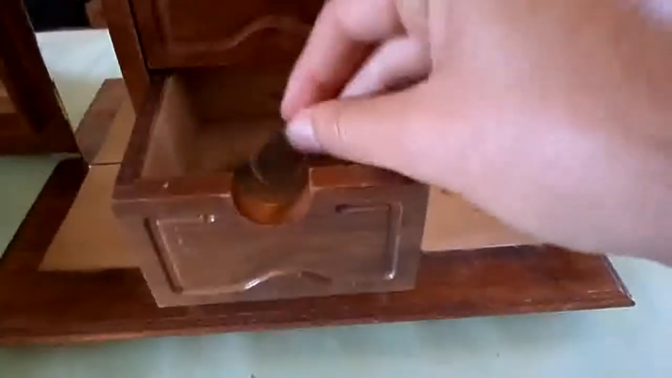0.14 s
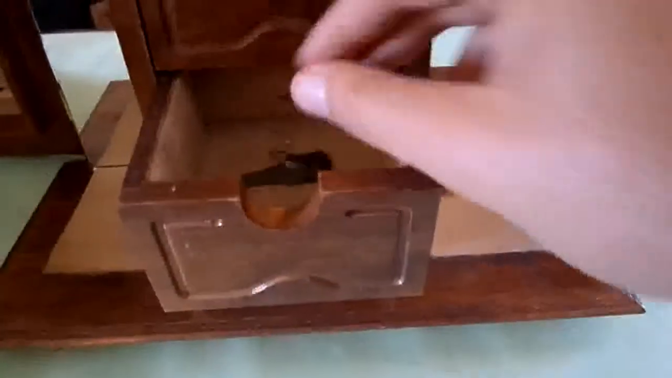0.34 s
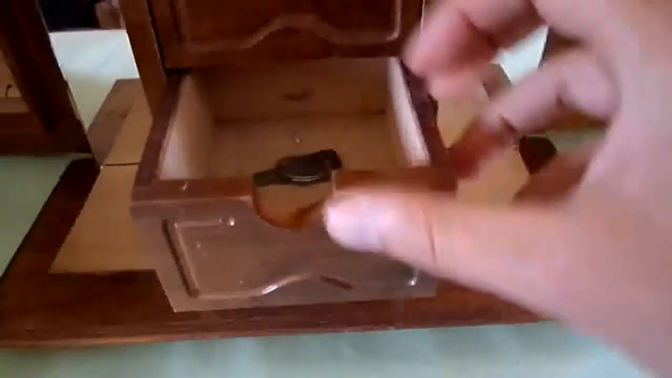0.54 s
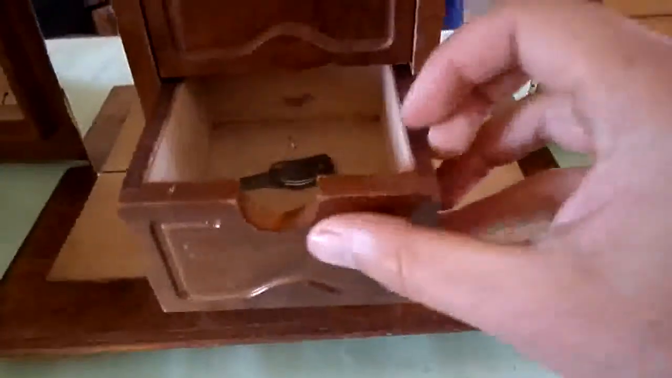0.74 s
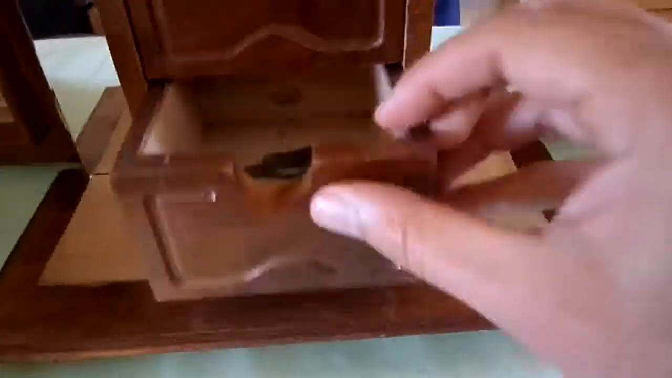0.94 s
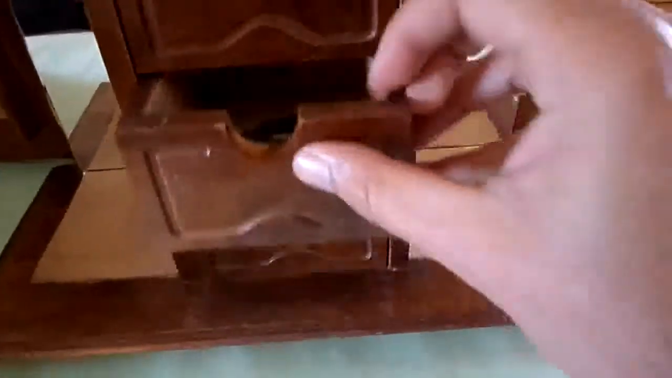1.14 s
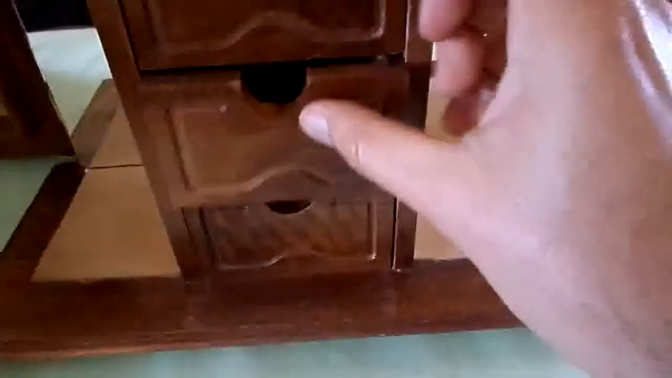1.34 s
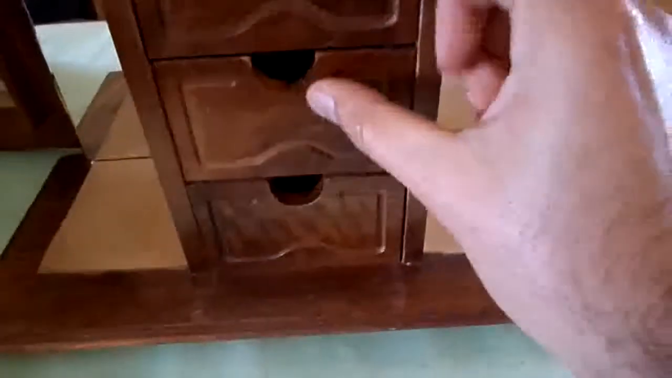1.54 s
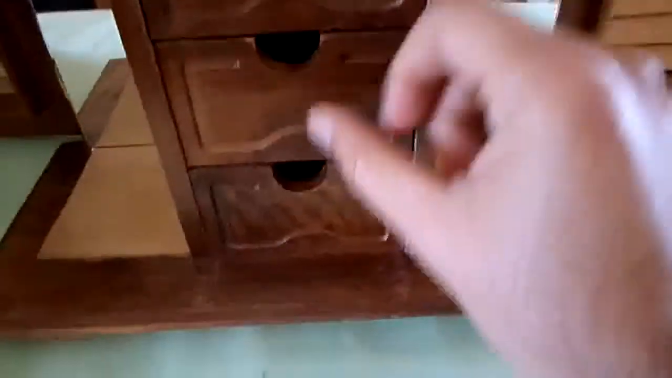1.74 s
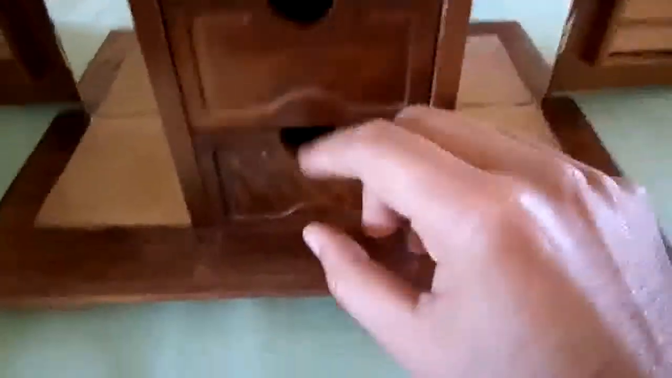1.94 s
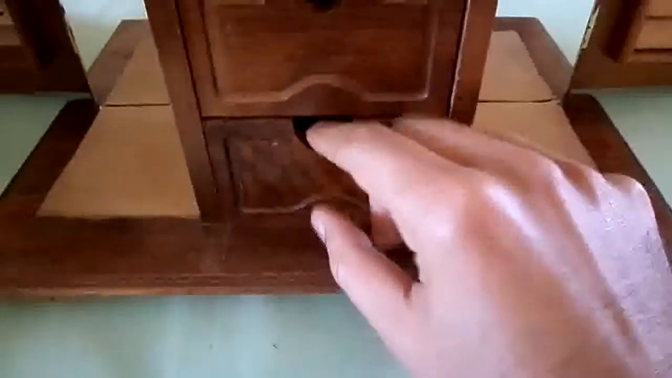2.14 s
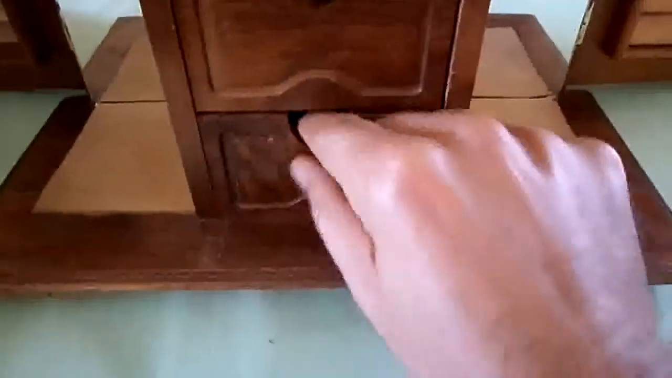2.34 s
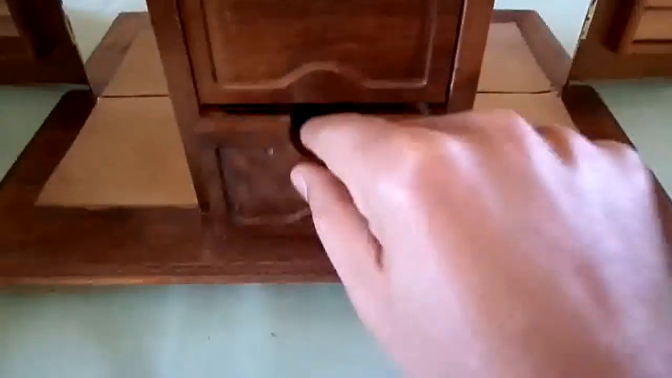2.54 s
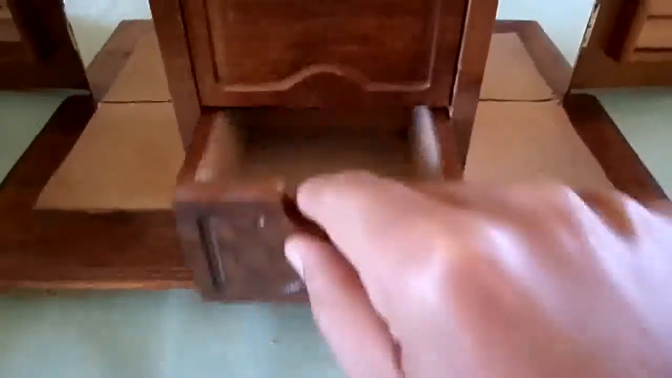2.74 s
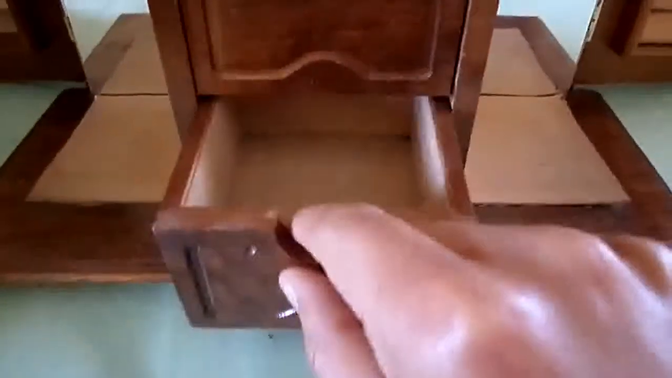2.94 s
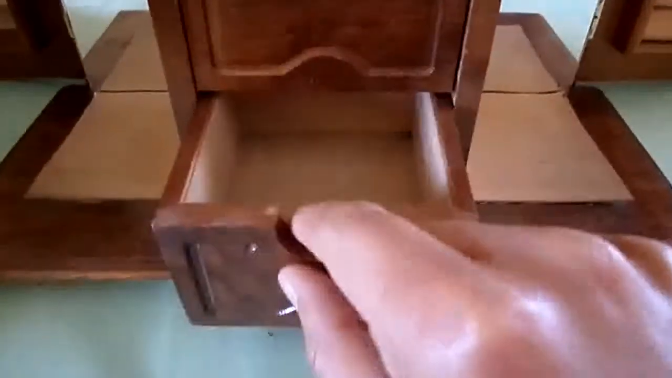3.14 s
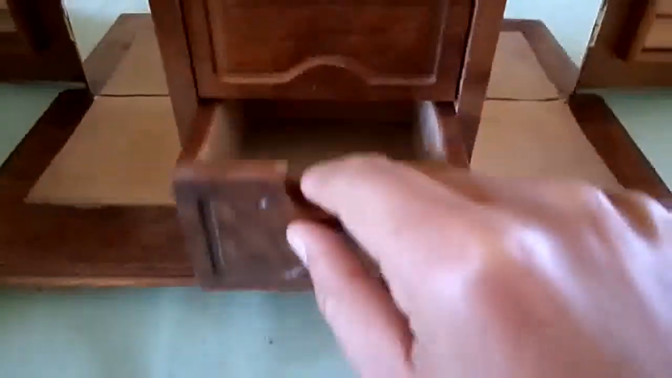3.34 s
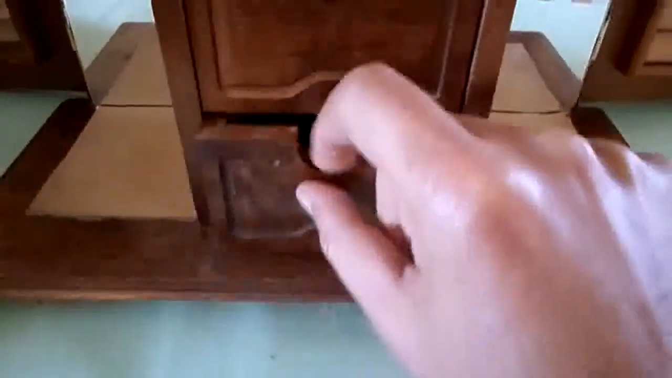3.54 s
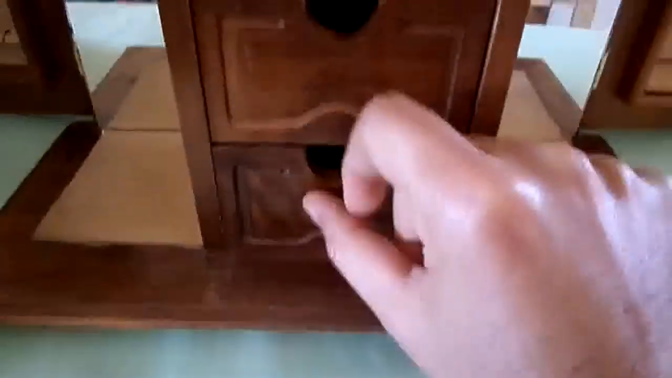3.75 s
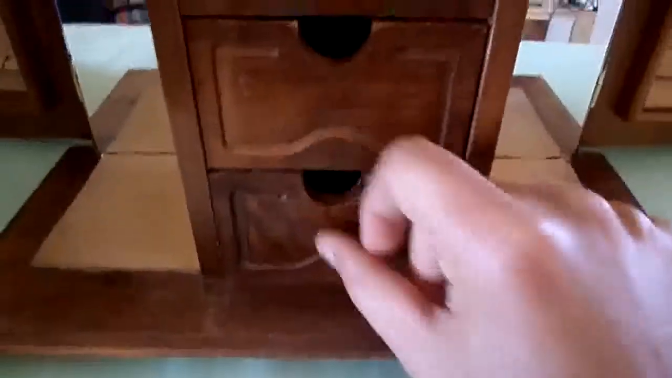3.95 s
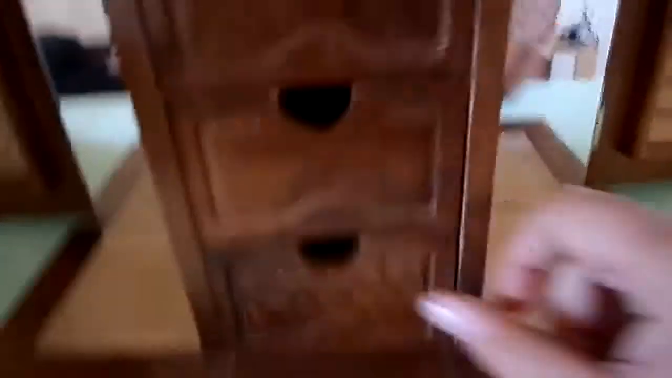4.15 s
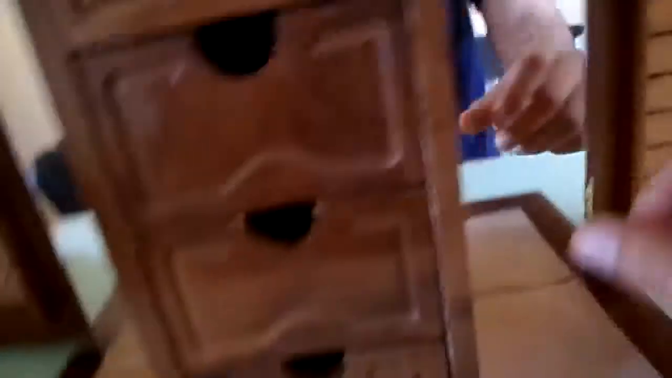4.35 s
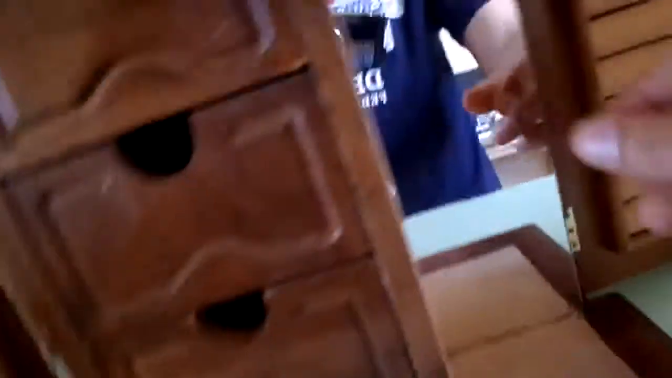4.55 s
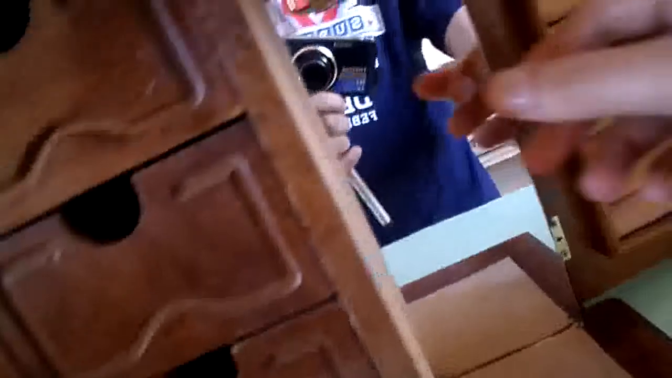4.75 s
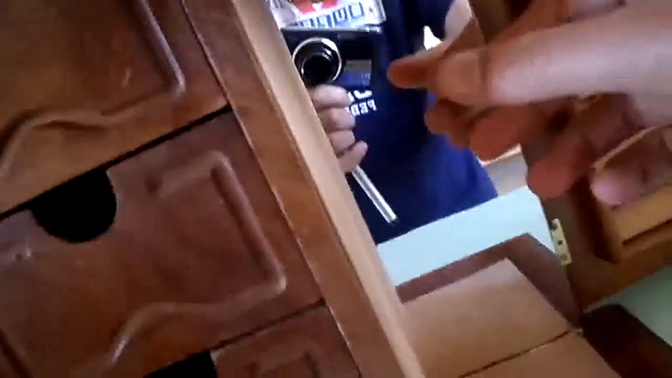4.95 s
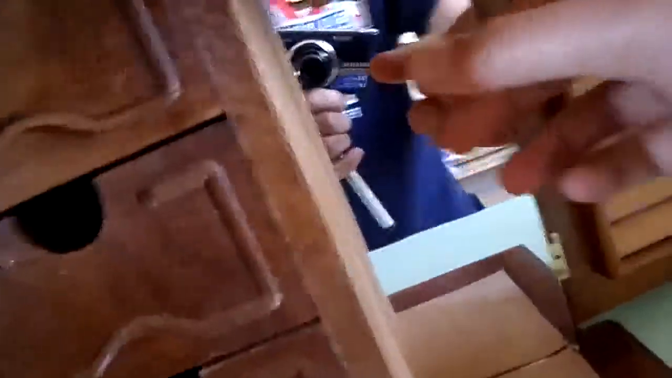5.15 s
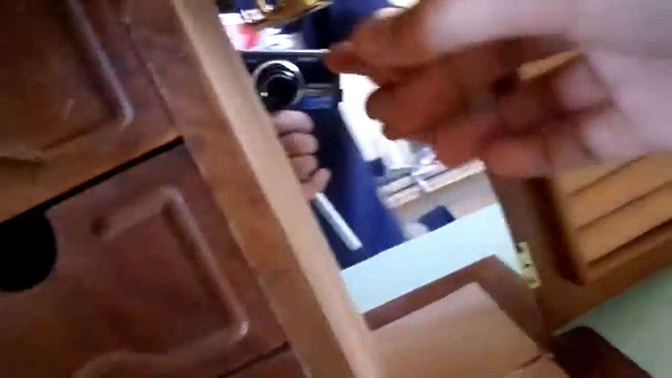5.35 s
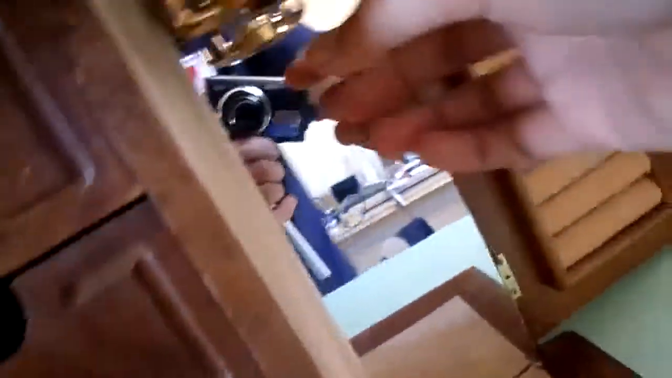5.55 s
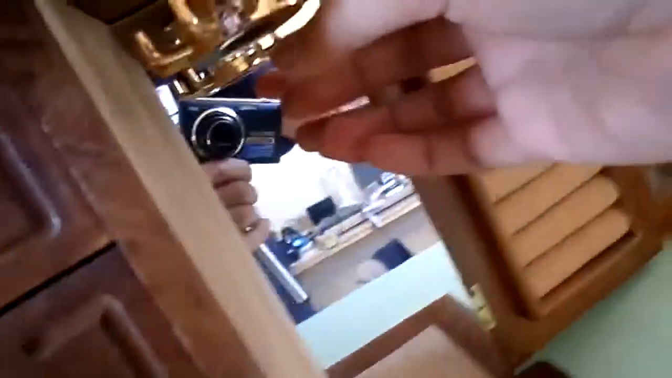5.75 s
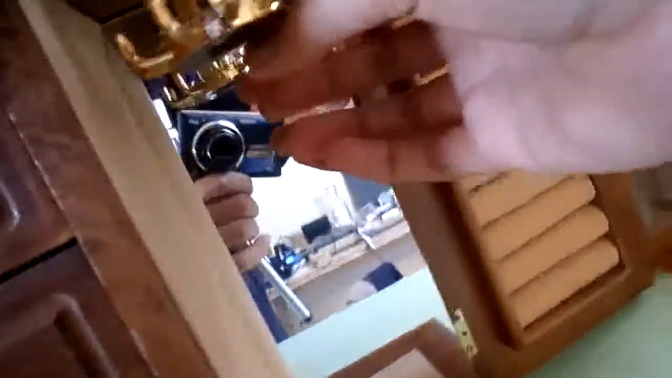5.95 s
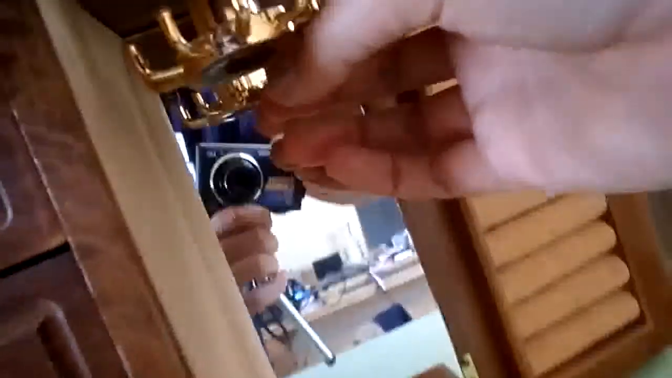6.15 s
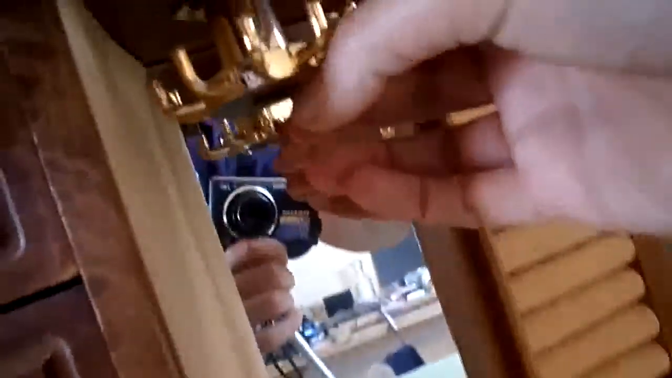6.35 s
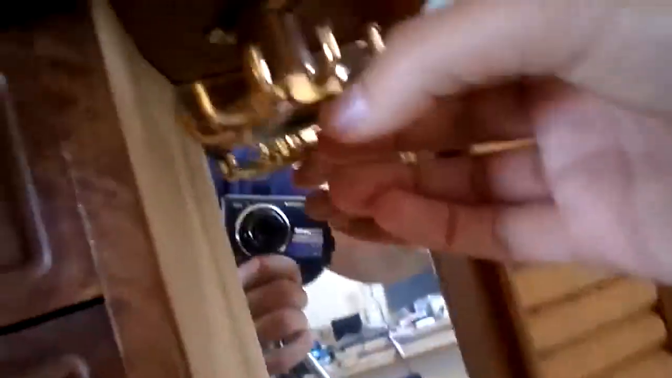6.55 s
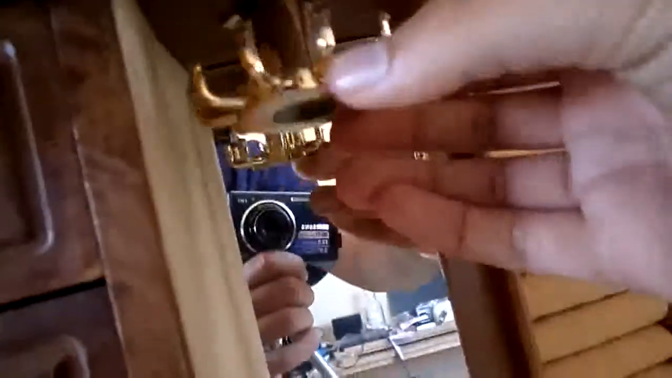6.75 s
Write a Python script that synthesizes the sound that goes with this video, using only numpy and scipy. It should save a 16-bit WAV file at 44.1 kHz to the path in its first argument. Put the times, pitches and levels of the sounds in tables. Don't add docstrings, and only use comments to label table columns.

```python
import sys
import numpy as np
from scipy import signal
from scipy.fft import rfft, irfft, next_fast_len
from scipy.io import wavfile
from scipy.ndimage import uniform_filter1d, minimum_filter1d, map_coordinates

SR = 44100
rng = np.random.default_rng(int(sys.argv[2]) if len(sys.argv) > 2 else 0)


def field_ratio(decibels):
    return 10 ** (np.asarray(decibels, dtype=float) / 20)


def pcm_store(signal):
    levels = np.round(np.clip(np.atleast_2d(signal), -1, 1) * 32767)
    wavfile.write(sys.argv[1], SR, levels.astype(np.int16).T)


N = 304290

# f/Hz, spectrum level/dB
HUM = [(12, -77.5), (20, -20), (71, -17), (171, -14), (500, -20.5), (900, -25), (8300, -36.5),
       (18300, -120)]
# f/Hz, width/Hz, level over floor/dB
DRONES = [(229, 54, 5.5), (357, 170, -6.5), (600, 110, 3), (7600, 670, -6)]
# f/Hz, t60/s
ROOM = [(200, 0.45), (1000, 0.17), (4000, 0.18), (8000, 0.047)]

# t/s, weight on runners/dB, speed/dB
STROKES = [
    [(.86, -73, -91), (.896, -49.5, -56.5), (.964, -29.5, -56.5), (1.07, -44.5, -55.5), (1.104, -31.5, -47),
     (1.18, -39.5, -50), (1.44, -46, -54), (1.57, -43.5, -65.5), (1.66, -56, -70)],
    [(2.42, -62, -69.5), (2.47, -36, -47), (2.53, -28.5, -42), (2.61, -35, -46.5), (2.644, -34.5, -42.5),
     (2.736, -35, -46.5), (2.86, -46.5, -54), (2.968, -51, -67.5), (3.02, -56, -76)],
    [(3.15, -65, -70.5), (3.22, -51, -55), (3.31, -42.5, -51.5), (3.4, -32.5, -44.5), (3.47, -31, -40.5),
     (3.612, -38.5, -48), (3.71, -37.5, -46.5), (3.77, -46, -62), (3.95, -54, -80)],
]
# t/s, length/s, weight/dB, coarse grit/dB, fine grit/dB
TOUCHES = [(.004, 0.039, -70.5, -60, -49), (3.742, 0.027, -32, -35, -57), (.715, 0.16, -37.5, -51.5, -58.5),
           (.96, 0.081, -54, -43, -66), (1.42, 0.66, -53, -52, -71), (1.54, 0.076, -31, -35, -57),
           (1.704, 0.23, -45, -54, -65), (1.81, 0.13, -57, -55.5, -67), (1.904, 0.13, -54.5, -56, -67),
           (2.068, 0.11, -45.5, -52.5, -56.5), (2.098, 0.086, -51, -60, -52.5), (2.31, 0.12, -69, -59, -56),
           (2.35, 0.14, -58, -58, -58), (2.73, 0.14, -51, -46, -70), (3.429, 0.067, -51, -19, -38.5),
           (3.724, 0.078, -21.5, -28, -49.5), (4.17, 0.41, -56.5, -62, -71),
           (4.236, 0.035, -59, -51.5, -56.5), (4.88, 0.47, -52.5, -56.5, -63.5),
           (5.248, 0.26, -59, -58.5, -67)]
# t/s, length/s, level/dB
JUDDERS = [
    (1.028, 0.59, -52),
    (1.104, 0.34, -47),
    (2.63, 0.83, -47.5),
    (3.53, 0.24, -42.5),
]
# from t/s, to t/s, f/Hz, level over grit/dB
SINGING_EDGES = [(0.65, 1, 5000, 9.5), (1.1, 1.1, 4500, 3.5), (0.75, 1.02, 2000, 8), (0.98, 1.4, 2100, 4.5),
                 (1.4, 0.83, 3800, 5.5), (1.42, 1.47, 2600, 3.5), (1.093, 1.384, 4610, 4.5),
                 (1.302, 1.46, 1050, 6.5), (2.445, 2.611, 1900, 1), (2.485, 2.579, 6550, 6.5),
                 (2.447, 2.857, 2920, 2), (2.591, 2.8, 4100, 0.5), (2.78, 2.97, 4170, 4.5),
                 (3.5, 3.3, 4100, 5), (3.24, 3.38, 3700, 1), (3.43, 5.2, 6610, -4.5), (3.53, 3.62, 4090, 2),
                 (3.456, 3.53, 3300, 1.5), (3.9, 3.72, 6630, 8.5), (3.61, 5.7, 1885, -10)]
# f/Hz, spectrum level/dB
SCRAPE = [(760, -19.5), (1300, -8), (3400, -13.5), (4130, -7), (4940, -7.5), (6630, -2.5), (8300, -9),
          (18300, -120)]
# f/Hz, width/Hz, level/dB
CASE = [(120, 30, -7.5), (178.7, 55, -6), (301.4, 127, -3), (467.4, 220, -4)]
# f/Hz, width/Hz, level/dB
UPPER = [(661, 170, 0), (844, 340, -3), (1200, 200, -10.5), (1490, 60, -20)]
# f/Hz, width/Hz, level/dB
LOWER = [(659, 220, -5.5), (821, 130, 0), (1130, 170, -5.5), (1988, 120, -9.5)]

# t/s, peak level/dB, tick level/dB, air over board level/dB, upper-mode level/dB
BOUNCES = [
    (.175, -35, -15, 5, 10),
    (0.188, -1, -18, 3.5, 3),
    (0.238, -10, -26, 5, 4.5),
    (0.2459, -1.5, -38, -6.5, -0.5),
    (0.2954, -12, -32, -12, -6),
    (0.3087, -10, -26, 1, -5),
    (0.3353, -1.5, -20, 10, 10),
    (0.359, -34, -7, 4, 3),
    (.37, -46, -8, 3.5, 3),
    (0.421, -55, 8, 3, 3),
]
# f/Hz, level/dB, t60/s
BOTTOM = [(785, 4.5, 0.045), (942, 2.5, 0.016), (490, -33.5, 0.085), (301.5, -20.5, 0.07)]
# f/Hz, level/dB, t60/s
AIR = [(1033, 5.5, 0.028), (1180, -23.5, 0.02)]
# f/Hz, level/dB, t60/s
FACE = [(1523, -23.5, 0.045), (1880, -13.5, 0.017), (2740, -10.5, 0.009), (3200, -15, 0.0091),
        (4830, -10.5, 0.006)]
# f/Hz, width/Hz, level/dB
HOLLOW = [(1082, 127, 3), (766, 136, -1.5)]
# t/s, length/s, singing level/dB, chatter level/dB
WOBBLES = [(.25, 0.045, -44, -40), (.278, 0.053, -47, -60), (.302, 0.073, -37.5, -48.5),
           (.32, 0.046, -44, -40.5), (.338, 0.05, -58, -26.5), (.362, 0.045, -57, -48),
           (.39, 0.074, -66, -54), (.42, 0.087, -55, -56.5)]
# f/Hz, width/Hz, level/dB
RIM = [(7600, 1000, 6), (5460, 2000, 6), (4210, 110, 10), (3500, 460, 2), (2095, 1100, 9)]
# f/Hz, width/Hz
VALLEYS = [(3850, 280), (6050, 450)]

# t/s, length/s, f/Hz, level/dB
CATCHES = [(.181, 0.023, 1340, -32), (.183, 0.018, 890, -32.5), (1.04, 0.071, 497, -44),
           (1.077, 0.027, 870, -36), (1.228, .05, 700, -42), (1.3, 0.028, 715, -42),
           (1.45, 0.045, 1200, -35.5), (2.66, 0.056, 504, -35), (2.68, 0.044, 1180, -36),
           (2.735, .04, 1140, -29.5), (2.778, 0.088, 1174, -40), (3.36, 0.074, 1146, -38),
           (3.661, .06, 427, -35), (3.81, .06, 497, -37.5), (3.857, .05, 328, -48),
           (1.0, 0.072, 822, -32.5), (1.105, 0.091, 806, -33), (1.11, 0.048, 293, -35),
           (1.2, 0.06, 276, -38.5), (1.27, 0.059, 194, -31.5), (1.27, 0.058, 670, -38),
           (1.32, .04, 725, -34), (1.36, 0.04, 726, -34.5), (1.378, 0.036, 420, -32),
           (1.475, 0.13, 452, -30), (1.59, 0.043, 307, -39), (2.5, 0.17, 476, -30.5),
           (2.59, 0.063, 424, -37), (2.625, 0.1, 812, -34.5), (2.76, 0.065, 553, -33), (2.8, .08, 450, -33),
           (2.89, 0.087, 300, -40.5), (3.27, 0.066, 836, -45.5), (3.435, 0.056, 314, -16),
           (3.47, 0.067, 317, -27), (3.5, 0.075, 782, -24), (3.528, 0.093, 874, -23.5),
           (3.54, 0.039, 244, -27.5), (3.575, .06, 264, -30.5), (3.575, .06, 850, -33),
           (3.62, 0.033, 870, -30.5), (3.65, 0.042, 810, -33), (3.688, 0.075, 448, -30.5),
           (3.76, 0.054, 437, -29), (3.9, 0.29, 416, -50.5)]
# t/s, length/s, f/Hz, level/dB
WHINES = [(.40, .1, 1110, -38), (.465, 0.083, 1130, -44.5), (.515, .09, 1073, -48), (.52, .12, 817, -54),
          (.59, .2, 1100, -58), (.44, .08, 732, -45.5), (.995, .07, 2220, -44), (1.05, .06, 2220, -51),
          (2.08, .1, 3080, -56), (2.08, .1, 1970, -58), (2.085, .1, 5000, -57), (2.335, .08, 1180, -54),
          (2.345, .09, 2460, -58), (2.485, .05, 1900, -41), (2.66, .08, 2900, -44), (2.83, .1, 2850, -52.5),
          (2.9, .2, 4150, -59), (5.99, .04, 1056, -38.5), (5.985, .06, 3750, -49), (6.44, .07, 3690, -55),
          (6.715, .04, 1240, -50)]

# t/s, peak level/dB, ring centre f/Hz, tick level/dB, t60/s
UPPER_KNOCKS = [(.722, -32.5, 600, -23, 0.047), (.916, -28, 786, -11, 0.26), (.938, -12, 808, -41, 0.046),
                (.953, -12.5, 1050, -20, 0.019), (.961, -16.5, 413, -21, 0.021),
                (1.076, -25, 820, -22, 0.037), (1.094, -29, 755, -24.5, 0.069),
                (1.128, -21.5, 300, -17, 0.14), (1.148, -15.5, 862, -33, 0.07),
                (1.167, -19, 890, -25, 0.038), (1.247, -26, 684, -11, 0.086),
                (1.347, -29, 1180, -19, 0.034), (1.401, -13, 463, -39, 0.083),
                (1.436, -12.5, 430, -22, 0.055), (1.531, -34.5, 880, 2, 0.026),
                (1.539, -15, 322.6, -31, 0.11), (1.702, -35, 171, -4, 0.07)]
# t/s, peak level/dB, ring centre f/Hz, tick level/dB, t60/s
LOWER_KNOCKS = [(2.164, -29.5, 336, -15, 0.051), (2.454, -35, 695, -8.5, 0.022),
                (2.458, -19, 460, -20, 0.023), (2.477, -24, 503, -23, 0.12), (2.5418, -11, 496, -16, 0.024),
                (2.56, -12.5, 475, -23, 0.049), (2.705, -17, 454, -23, 0.046),
                (2.709, -13.5, 855, -26.5, 0.051), (2.726, -20.5, 408, -24, 0.032),
                (2.723, -15, 1200, -26, 0.047), (2.953, -33, 398, -14, 0.084),
                (2.956, -35, 886, -18, 0.034), (3.22, -28.5, 472, -21.5, 0.039),
                (3.335, -17, 427, -31.5, 0.1), (3.336, -21.5, 838, -25.5, .13),
                (3.3972, -14, 429, -18, 0.19), (3.4246, -8, 672, -20.5, 0.012),
                (3.4263, 2.5, 808, -20, 0.032), (3.44, -8.5, 540, -26.5, 0.028),
                (3.706, -16.5, 490, -29, 0.026), (3.718, -14.5, 308, -2.5, 0.024),
                (3.729, -16, 428, -25, 0.037), (3.7391, -7.5, 499, -27, 0.023),
                (3.7395, -19.5, 1020, -17, 0.011), (3.746, -17, 408, -28, 0.021)]
# t/s, peak level/dB, f/Hz, t60/s
SNAPS = [(.7225, -35, 900, 0.019), (.915, -33, 850, .03), (1.2485, -31, 750, .03),
         (1.5325, -30, 1880, .015), (2.5425, -12, 720, 0.01), (2.726, -29.5, 1810, 0.032),
         (3.397, -21.5, 600, .03), (3.4255, -11.5, 812, .03), (3.7195, -14, 600, .01),
         (1.5335, -35.5, 2980, .012), (1.535, -36, 4630, 0.009), (3.428, -25, 2400, .012),
         (3.7195, -26, 3600, .01), (3.7405, -24.5, 2080, 0.014), (2.562, -19, 1000, 0.022)]
# t/s, peak level/dB, f/Hz
THUMPS = [
    (0.949, -45, 148),
    (1.542, -33.5, 120),
    (1.849, -54, 103.5),
    (2.549, -36.5, 144),
    (3.427, -37.5, 97),
    (3.742, -43.5, 100.6),
]

# t/s, peak level/dB, ring f/Hz, t60/s, click over ring level/dB
TICKS = [(1.694, -40, 3960, 0.012, 0), (1.802, -41, 4460, 0.01, -5), (1.899, -47, 4050, 0.01, -7),
         (2.0661, -22, 3820, 0.018, -3), (4.235, -53, 1620, 0.0089, -5), (5.915, -37, 2370, .015, 2),
         (5.924, -31, 2190, 0.024, 2), (5.931, -29, 2400, 0.033, -5), (5.9389, -22, 3740, 0.023, -1),
         (5.9415, -25, 2430, 0.02, -7), (5.9465, -31, 2700, .015, -11), (5.9876, -36, 5200, 0.011, 0),
         (5.996, -36, 5830, .012, 2), (5.9955, -26.5, 2620, 0.019, -8), (6.4002, -30, 1400, 0.014, 5),
         (6.4088, -25, 3830, 0.012, 8), (6.4205, -29, 1150, .025, -1), (6.425, -26.5, 3730, 0.028, -11),
         (6.473, -42, 3720, .012, -9), (6.474, -37, 1910, 0.047, -12), (6.689, -30, 6550, 0.042, -9),
         (6.6953, -15.5, 3710, 0.022, -9), (6.6953, -23.5, 3080, 0.011, -9),
         (6.6953, -26, 5080, 0.023, -12), (6.699, -31, 4500, 0.011, 3), (6.716, -44, 3300, .03, 2),
         (6.74, -45, 3200, .03, 3), (6.8606, -47, 1880, 0.04, 4)]
# f/Hz, level/dB
HOOKS = [(2350, -10), (3000, 14.5), (3730, 1), (5050, 12.5), (6500, 5)]
# t/s, length/s, rasp level/dB, side panel level/dB
NUDGES = [(5.94, 0.14, -38.5, -43.5), (5.975, 0.11, -48, -72), (5.995, 0.072, -39, -37),
          (6.015, 0.039, -73, -32.5), (6.06, .1, -57, -51), (6.2, 0.098, -75, -48),
          (6.305, 0.14, -59, -45.5), (6.412, 0.093, -36.5, -41.5), (6.44, 0.044, -58, -39.5),
          (6.476, 0.043, -48.5, -58), (6.52, 0.11, -59, -49), (6.635, 0.13, -55.5, -40.5),
          (6.693, 0.025, -38.5, -42), (6.722, 0.093, -50.5, -33.5), (6.79, 0.12, -55, -46),
          (6.845, 0.14, -57, -43.5), (6.89, .1, -61, -46.5)]
# f/Hz, spectrum level/dB
RASP = [(470, -2.5), (800, -13), (1080, 4), (1770, -9), (2280, -2.5), (3600, -8.5), (6630, -11),
        (8300, -28)]
# f/Hz, level/dB
SIDE_PANEL = [(186, 2), (297, -14), (410, -18.5), (570, -16)]
# t/s, f/Hz, level/dB
SQUEAK = [
    (2.05, 3700, -65),
    (2.064, 3770, -41.5),
    (2.108, 3680, -44),
    (2.116, 3730, -70),
    (2.15, 3680, -71),
]

SWAP_S = 2
CONTACT_S = 0.001314
RISE_SHARE = 0.38
SWELL_EDGE_DB = 32
TOP_HZ = 8450


def unit(x):
    return x / np.sqrt(np.mean(x ** 2) + 1e-20)


def along(points, hz):
    f, v = np.transpose(points)
    return np.interp(np.log(hz + 1), np.log(f + 1), v)


def gains(tables, column):
    t = np.arange(N) / SR
    total = 0
    for rows in tables:
        points = np.array(rows)
        total = total + field_ratio(np.interp(t, points[:, 0], points[:, column], -200, -200))
    return total


def swells(rows, column):
    out = np.zeros(N + 2 * SR)
    t = np.arange(-SR // 5, SR // 4) / SR
    for row in rows:
        rise_s = RISE_SHARE * row[1]
        fall_s = row[1] - rise_s
        drop_db = SWELL_EDGE_DB * np.maximum(-t / rise_s, t / fall_s) ** 1.1
        add(out, row[0], field_ratio(row[column] - drop_db))
    return out[SR // 5:][:N]


def wobble(rate_hz):
    knots = rng.standard_normal(int(N * rate_hz / SR) + 4)
    return map_coordinates(knots, [np.arange(N) * rate_hz / SR])


def filtered(x, response):
    m = next_fast_len(N + SR // 2)
    return irfft(rfft(x, m) * response(np.fft.rfftfreq(m, 1 / SR)), m)[:N]


def modes(table):
    def response(f):
        total = 0
        for k, (centre, width, db) in enumerate(table):
            damping = 1j * f * width
            total = total + (-1) ** k * field_ratio(db) * damping / (centre * centre - f * f + damping)
        return total
    return response


def grit(rough_db, clump_db):
    level_db = rough_db * wobble(300) + clump_db * wobble(45)
    return unit(rng.standard_normal(N) * field_ratio(level_db))


def patchy(x, depth_db):
    z = signal.stft(x, nperseg=512)[2]
    field = uniform_filter1d(rng.standard_normal(z.shape), 4, axis=0)
    field = uniform_filter1d(field, 9, axis=1)
    return signal.istft(z * field_ratio(depth_db * unit(field)), nperseg=512)[1][:N]


def add(track, s, sound):
    spot = track[round(s * SR):][:len(sound)]
    spot += sound[:len(spot)]


def ring(table, t, attack_s, lag_s=0):
    x = sum(field_ratio(db - 60 * t / abs(t60)) * np.sin(2 * np.pi * hz * (t - lag_s)) for hz, db, t60 in table)
    x = x * (1 - np.exp(-t / attack_s)) ** 2
    return x / np.abs(x).max()


def crack(t, t60_s, top_hz, rise_s):
    burst = rng.standard_normal(len(t)) * field_ratio(-60 * t / t60_s) * (1 - np.exp(-t / rise_s)) * 2
    return signal.lfilter(*signal.butter(1, [1300, top_hz], "band", fs=SR), burst)


def hum(near):
    depth_db, knee, release_s = 7, 0.1, 0.15
    noise = unit(filtered(rng.standard_normal(N),
                          lambda f: field_ratio(along(HUM, f)) * (1 + np.abs(modes(DRONES)(f)))))
    step = 1 / (release_s * SR)
    loud = signal.lfilter([step], [1, step - 1], near ** 2) ** .5
    return field_ratio(-51 + 0.64 * wobble(2.1) - depth_db * np.tanh(loud / knee)) * noise


def slides():
    case = unit(filtered(grit(2, 1.3), lambda f: np.abs(modes(CASE[1:])(f)) ** 1.4))
    upper = unit(filtered(grit(2, 1.2), lambda f: np.abs(modes(UPPER)(f)) ** 1.5))
    lower = unit(filtered(grit(2, 1.2), lambda f: np.abs(modes(LOWER)(f)) ** 1.5))
    panel = np.where(np.arange(N) < SWAP_S * SR, upper, lower)

    dust = patchy(grit(1.8, .6), depth_db=1.6)
    rubbed = dust.copy()
    edge_width_hz = 340
    for start_s, end_s, hz, db in SINGING_EDGES:
        rub = dust[round(start_s * SR):round(end_s * SR)]
        edge = signal.lfilter(*signal.iirpeak(hz, hz / edge_width_hz, SR), rub)
        add(rubbed, start_s, field_ratio(db) * edge * signal.windows.tukey(len(rub), .5))

    def fine(f):
        return 1 / (1 + (3850 / (f + 1)) ** 8)

    scrape = unit(filtered(rubbed, lambda f: field_ratio(along(SCRAPE, f)) * (1 - fine(f))))
    hiss = unit(filtered(rubbed, lambda f: field_ratio(along(SCRAPE, f)) * fine(f)))

    weight, speed = gains(STROKES, column=1), gains(STROKES, column=2)
    touch, coarse, smooth = (swells(TOUCHES, column=k) for k in range(2, 5))
    speed_share, panel_db, coarse_db = 0.25, -0.5, 2.5
    drive = weight ** (1 - speed_share) * speed ** speed_share
    shake = field_ratio(panel_db) * (drive + 0.38 * touch) + swells(JUDDERS, column=2)
    wood = (weight + touch) * case + shake * panel
    return wood + (field_ratio(coarse_db) * speed + coarse) * scrape + (speed + smooth) * hiss


def coin():
    out, linger = np.zeros(N), np.zeros(N)
    t = np.arange(SR // 2) / SR
    t_hit = t[:SR // 8]
    for s, db, tick_db, air_db, upper_db in BOUNCES:
        air = [(hz, level + air_db, t60) for hz, level, t60 in AIR]
        face = [(hz, level + upper_db, t60) for hz, level, t60 in FACE]
        struck = ring(BOTTOM + air + face, t_hit, 0.00063, CONTACT_S)
        tick = field_ratio(tick_db - 5.0) * crack(t_hit, 0.023, top_hz=5480, rise_s=0.0019)
        add(out, s, field_ratio(db) * (struck + tick))
        add(linger, s, field_ratio(db - 39 - 60 * t / 0.53) * (1 - np.exp(-t / .012)))
    hollow = unit(filtered(grit(0.81, 1.4), lambda f: np.abs(modes(HOLLOW)(f)) ** 1.07))

    settle_hz, settle_s = 600, 0.014
    since_s = np.abs(np.arange(N) / SR - WOBBLES[0][0] + 0.0046)
    song_hz = 7140 + settle_hz * np.exp(-since_s / settle_s)
    phase = 2 * np.pi * np.cumsum(song_hz) / SR + 0.65 * wobble(270)
    song = field_ratio(1.2 * wobble(83)) * np.sin(phase)
    chatter = unit(filtered(grit(1.7, 0.85), lambda f: modes(RIM)(f) ** 2))
    out = out + linger * hollow + swells(WOBBLES, column=2) * song + swells(WOBBLES, column=3) * chatter

    def valleys(f):
        return np.prod([1 - .8 * modes([(hz, width, 0)])(f) for hz, width in VALLEYS], axis=0)

    flat_s = .225
    return np.where(np.arange(N) < flat_s * SR, out, filtered(out, valleys))


def catches(rows):
    out, t = np.zeros(N), np.arange(-SR // 10, SR // 7) / SR
    for (s, length, hz, db), chance in zip(rows, rng.standard_normal((len(rows), 2, 60))):
        drift, flutter = (map_coordinates(c, [np.linspace(0, 59, len(t))]) for c in chance)
        rise_s = RISE_SHARE * length
        drop_db = SWELL_EDGE_DB * np.maximum(-t / rise_s, t / (length - rise_s)) ** 1.7
        tone = np.sin(2 * np.pi * hz * t + 0.41 * drift)
        add(out, s - .1, field_ratio(db + 2 * flutter - drop_db) * tone)
    return out


def knocks():
    out, t = np.zeros(N), np.arange(SR // 5) / SR
    blows = UPPER_KNOCKS + LOWER_KNOCKS
    for (s, db, centre_hz, tick_db, t60), chance in zip(blows, rng.standard_normal((len(blows), 8))):
        wood = CASE + (UPPER if s < SWAP_S else LOWER)
        near = []
        for (hz, width, level), c in zip(wood, chance):
            near_db = level + 1.7 * c - 8 * np.log2(hz / centre_hz) ** 2
            near.append((hz * (1 + 0.015 * c), near_db, t60 * (centre_hz / hz) ** 0.5))
        push_db = -9 - 7 * np.log2(centre_hz / 500)
        blow = [(centre_hz, 0, t60), (1.4 * centre_hz, push_db, .014)]
        tick = field_ratio(tick_db - 2.0) * crack(t, 0.024, top_hz=5000, rise_s=0.0012)
        add(out, s, field_ratio(db) * (ring(near + blow, t, 0.0015) + tick))
    return out


def snaps():
    out, t = np.zeros(N), np.arange(SR // 10) / SR
    for s, db, hz, t60 in SNAPS:
        add(out, s, field_ratio(db) * ring([(hz, 0, t60)], t, .0003))
    return out


def thumps():
    out, t = np.zeros(N), np.arange(SR // 3) / SR
    for s, db, hz in THUMPS:
        add(out, s, field_ratio(db) * ring([(hz, 0, .18)], t, 0.0036))
    return out


def carousel():
    rasp = unit(filtered(grit(3.5, .8), lambda f: field_ratio(along(RASP, f))))
    boom = np.zeros(N)
    for hz, db in SIDE_PANEL:
        level = field_ratio(db + 0.86 * wobble(30))
        boom += level * np.sin(2 * np.pi * hz * np.arange(N) / SR + 0.64 * wobble(30))
    out = swells(NUDGES, column=2) * rasp + swells(NUDGES, column=3) * unit(boom)

    t = np.arange(SR // 10) / SR
    for (s, db, hz, t60, click_db), chance in zip(TICKS, rng.standard_normal((len(TICKS), len(HOOKS)))):
        hooks = [(f, level - 21.5 + 3 * c, 0.4 * t60) for (f, level), c in zip(HOOKS, chance)]
        brass = ring([(hz, 0, t60)] + hooks, t, 0.00021, CONTACT_S)
        click = field_ratio(click_db - 7.5) * crack(t, t60, top_hz=6750, rise_s=0.00097)
        add(out, s, field_ratio(db - 5.5) * (brass + click))
    return out


def squeak():
    nail_hz = np.mean(SQUEAK, axis=0)[1]
    tone = unit(filtered(grit(1.8, 1.5), lambda f: modes([(nail_hz, 330, 0)])(f) ** 2))
    return gains([SQUEAK], 2) * tone


def room(x):
    hz, t, z = signal.stft(rng.standard_normal(SR // 2), SR, nperseg=256)
    decay = field_ratio(-60 * t / along(ROOM, hz)[:, None])
    build = 1 - np.exp(-t / 0.0072)
    tail = signal.istft(z * decay * build, SR, nperseg=256)[1]
    return signal.fftconvolve(x, tail / np.linalg.norm(tail))[:N]


def thinned(x):
    gap_share, gap_follows, gap_hz = .012, .22, 2500
    hz, t, z = signal.stft(x, SR, nperseg=1024)
    power = uniform_filter1d(np.abs(z) ** 2, size=3, axis=1)
    band_db = 10 * np.log10(np.abs(uniform_filter1d(power, size=5, axis=0)) + 1e-20)
    around_db = uniform_filter1d(band_db, size=40, axis=0)
    total_db = 10 * np.log10(power.sum(axis=0) + 1e-20)
    luck = uniform_filter1d(rng.standard_normal(z.shape), size=4, axis=0)
    luck = uniform_filter1d(luck, size=5, axis=1)
    worth_db = band_db - around_db + gap_follows * (around_db - total_db) + 2.5 * unit(luck)
    inside = (hz > gap_hz) & (hz < TOP_HZ - 400)
    weak = inside[:, None] & (worth_db < np.quantile(worth_db[inside], gap_share))
    keep = minimum_filter1d(1.0 * ~weak, size=3, axis=0)
    keep = minimum_filter1d(keep, size=2, axis=1, origin=-1)
    return signal.istft(z * (.06 + .94 * keep), SR, nperseg=1024)[1][:N]


def scene():
    near = slides() + coin() + catches(CATCHES) + catches(WHINES)
    near = near + knocks() + snaps() + thumps() + carousel() + squeak()
    near = signal.lfilter(*signal.butter(2, 85, "high", fs=SR), near)
    return (near + field_ratio(-19) * room(near) + hum(near))[None]


def top_cut(x):
    return signal.sosfilt(signal.butter(12, 15900, fs=SR, output="sos"), x)


def record(dry):
    ceiling, spill_db = .7, -5
    x = filtered(dry[0], lambda f: 1 / (1 + (f / TOP_HZ) ** 90))
    x = x / (1 + np.abs(x / ceiling) ** 16) ** (1 / 16)

    def output(f):
        low_cut = 1 / (1 + (35 / (f + 1)) ** 2) ** .5
        return np.where(f < TOP_HZ + 300, 1, field_ratio(spill_db)) * low_cut

    x = filtered(thinned(x), output)
    return top_cut(x[None])


dry = scene()
out = record(dry)
pcm_store(out)
```